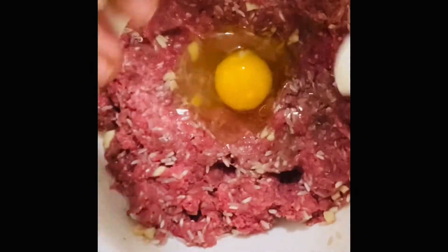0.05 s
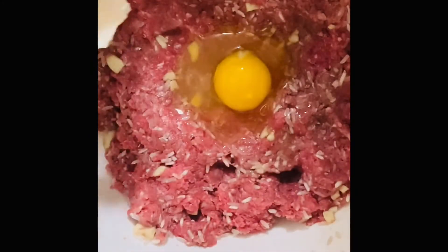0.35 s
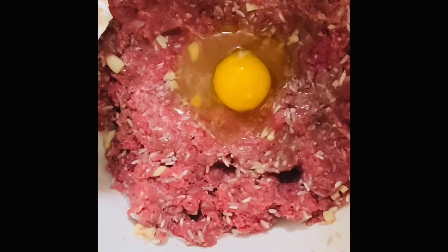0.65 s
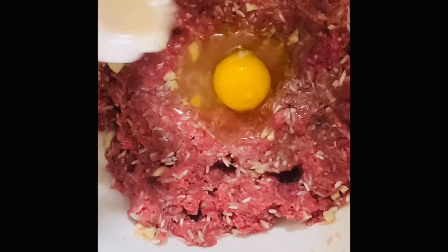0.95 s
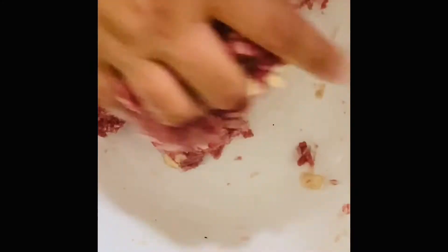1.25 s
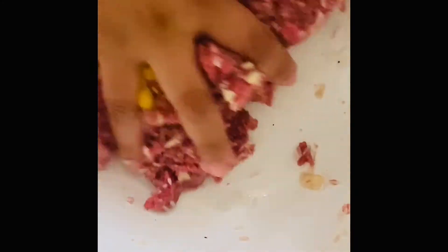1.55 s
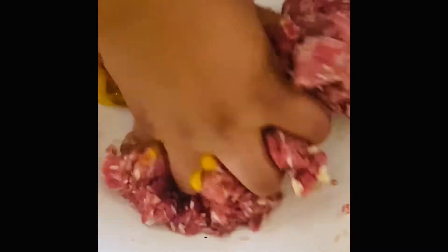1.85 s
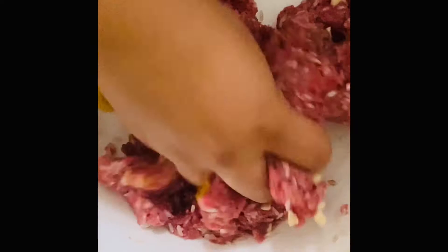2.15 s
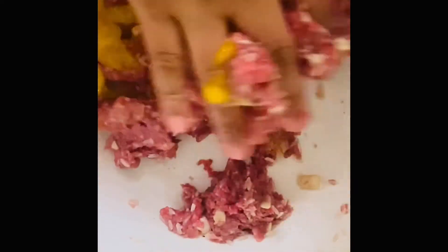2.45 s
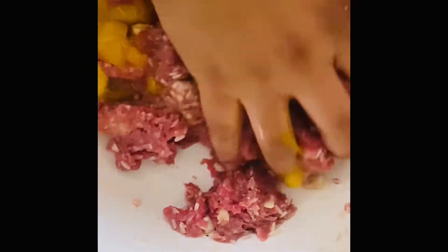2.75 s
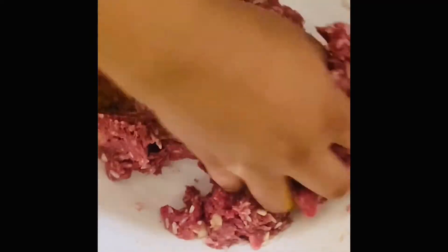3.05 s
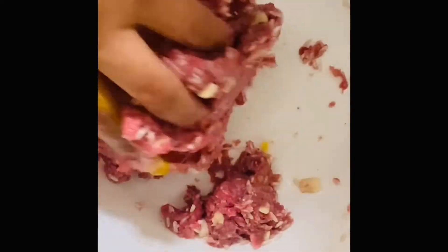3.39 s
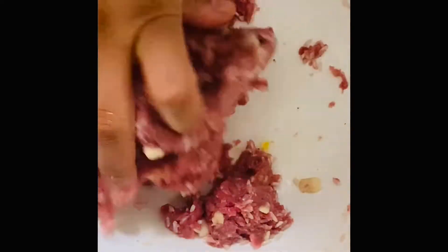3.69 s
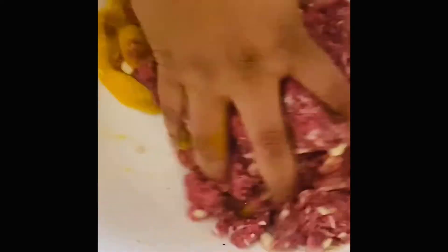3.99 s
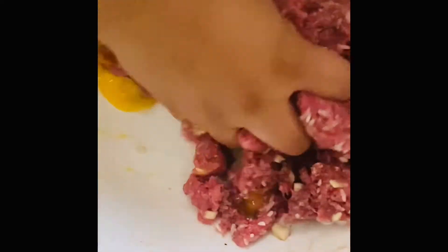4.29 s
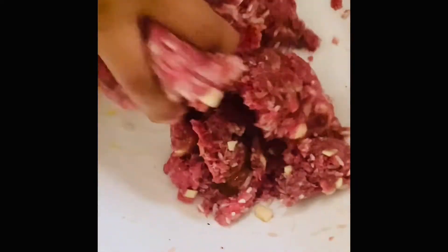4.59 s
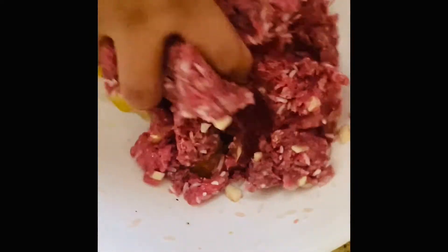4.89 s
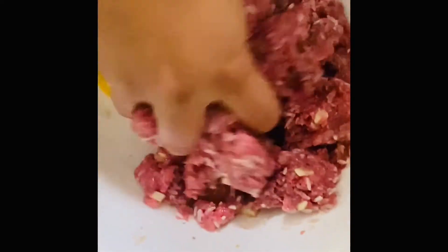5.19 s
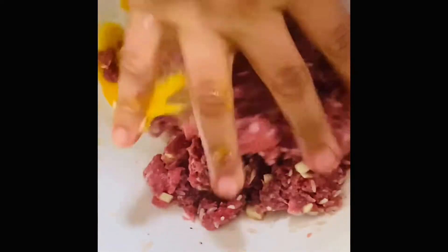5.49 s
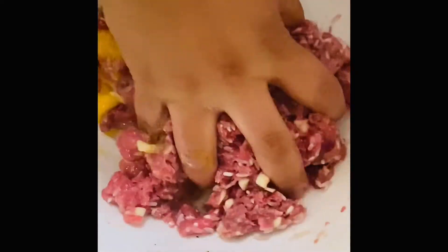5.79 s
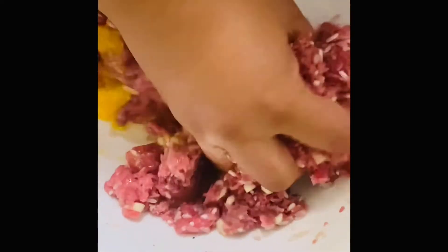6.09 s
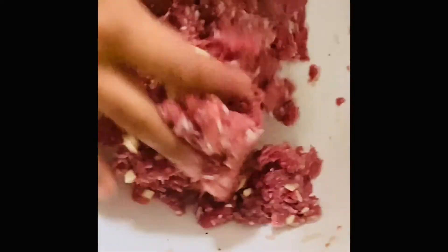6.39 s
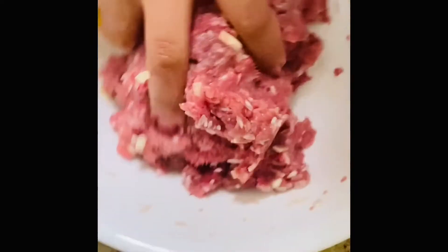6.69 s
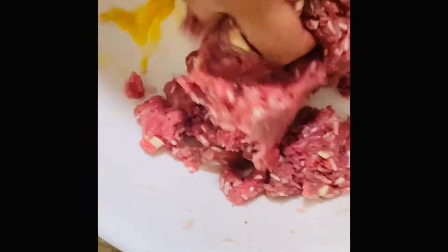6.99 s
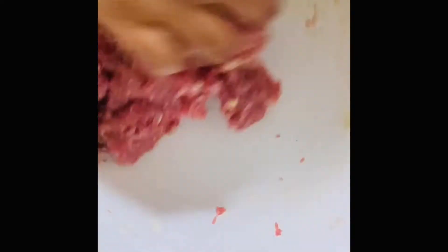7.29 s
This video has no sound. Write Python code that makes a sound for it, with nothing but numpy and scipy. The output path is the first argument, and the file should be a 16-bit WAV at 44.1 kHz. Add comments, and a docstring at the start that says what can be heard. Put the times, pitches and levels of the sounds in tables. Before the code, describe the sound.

Wet, sticky squishing comes in uneven squeezes as a hand mixes ground meat with egg and rice close to the microphone, with tiny air pockets crackling and popping. The bowl rocks with dull thuds, clinks once, scrapes briefly across the counter and then gives two sharp knocks. Near the end a muffled bump hits the microphone while the kneading carries on. An appliance hums faintly in the small kitchen.

```python
"""A bare hand kneads ground meat, rice and egg in a bowl on a kitchen counter, close to a phone.
First comes dry brushing over the hum of a small, echoing room. From about 1 s the hand squeezes:
wet films tear and air pockets crackle and pop, while the rocking bowl knocks on the counter.
The rim clinks at 2.5 s, the bowl skids at 3.3 s, and it knocks hardest at 4.3 s and 5.2 s.
A wet fingertip squeaks at 5.8 s, the phone is bumped at 6.2 s, and the kneading carries on."""
import sys
import numpy as np
from scipy import signal
from scipy.fft import rfft, irfft
from scipy.io import wavfile

SR = 44100
rng = np.random.default_rng(int(sys.argv[2]) if len(sys.argv) > 2 else 0)


def waveform_to_disk(signal):
    """Save audio, clipped to [-1, 1], as 16-bit WAV at the path in sys.argv[1]."""
    frames = np.transpose(np.atleast_2d(signal))
    scaled = np.clip(frames, -1, 1) * 32767
    samples = np.round(scaled).astype(np.int16)
    wavfile.write(sys.argv[1], SR, samples)


N = 328533
TIME, FREQS = np.arange(N) / SR, np.fft.rfftfreq(N, 1 / SR)
RING_T = np.arange(SR // 2) / SR  # half a second: the clock for one short sound


def amp(db):
    """Turns decibels into a number to multiply by."""
    return 10 ** (np.asarray(db) / 20)


def evened(x):
    """Scales a sound to an average strength (rms) of one."""
    return x / np.sqrt(np.mean(x ** 2) + 1e-20)


def read(points, hz):
    """Looks up a frequency in a table, sliding between rows on a log scale."""
    f, value = np.transpose(points)
    return np.interp(np.log(hz + 1), np.log(f + 1), value)


def shaped(x, gain):
    """Turns each frequency up or down, then evens the strength."""
    return evened(irfft(rfft(x) * gain, N))


def cut(x, hz, kind="low", order=2):
    """Keeps the part below ("low") or above ("high") a frequency."""
    return signal.sosfilt(signal.butter(order, min(hz, SR / 2 - 100), kind, fs=SR, output="sos"), x)


def fade(t60):
    """Dies away by 60 dB in t60 seconds: the "fade time" in the tables."""
    return amp(-60 * RING_T / max(t60, 1e-4))


def add(mix, s, sound):
    """Mixes a sound in at s seconds."""
    part = mix[max(round(s * SR), 0):][:len(sound)]
    part += sound[:len(part)]


def noise(spectrum):
    """Steady noise with the given tone colour."""
    return shaped(rng.standard_normal(N), amp(read(spectrum, FREQS)))


def flutter(depth_db, low_hz, high_hz):
    """A loudness that wobbles at random, at rates between the two given."""
    wobble = shaped(rng.standard_normal(N), (FREQS > low_hz) & (FREQS < high_hz))
    return evened(amp(depth_db * wobble))


def excerpt(x):
    """A random half second of a long sound."""
    return x[rng.integers(N - len(RING_T)):][:len(RING_T)]


def grains(low_hz, high_hz, per_s, spread_db, cycles, count=16):
    """Crackle: tiny, very short ticks of many pitches at random moments."""
    out, t = np.zeros(N), RING_T[:SR // 40]
    for hz in np.geomspace(low_hz, high_hz, count):
        size = amp(spread_db * np.minimum(rng.exponential(1, N), 4)) * rng.choice([-1, 1], N)
        train = size * (rng.random(N) < per_s / count / SR)
        tick = hz * np.sin(2 * np.pi * hz * t) * np.exp(-hz * t / cycles)
        out += signal.oaconvolve(train, tick)[:N]
    return evened(out)


def crowded(x, mush, count=14):
    """Swaps a share of a crackle for many more, smaller ticks."""
    dense = sum(np.roll(x, shift) for shift in rng.integers(N, size=count)) / np.sqrt(count)
    return np.sqrt(1 - mush) * x + np.sqrt(mush) * dense


def ring(notes):
    """The fading notes of a struck object; neighbours swing opposite ways."""
    return sum((-1) ** k * amp(db) * np.sin(2 * np.pi * hz * RING_T) * fade(t60)
               for k, (hz, db, t60) in enumerate(notes))


def resonate(x, hz, width_hz):
    """Brings out the part of a sound near one pitch, which may glide."""
    turn = np.exp(2j * np.pi * np.cumsum(hz * np.ones(len(x))) / SR)
    r = np.exp(-np.pi * width_hz / SR)
    return (turn * signal.lfilter([(1 - r) ** 2], [1, -2 * r, r * r], x / turn)).real


def swells(moves, release_s, rest_db, swell_db=18.5):
    """Loudness of hand movements: each rises by swell_db over its build-up, then lets go."""
    power = amp(rest_db) ** 2 * np.ones(N)
    for s, build_s, db in moves:
        away = np.maximum((s - TIME) / build_s, (TIME - s) / release_s)
        near = away < 5
        power[near] += amp(db - swell_db * away[near]) ** 2
    return np.sqrt(power)


# tone colour of the quiet room: (frequency [Hz], level [dB])
ROOM_HUSH = [(20, -6), (55, 39.5), (150, -7), (270, 11), (700, -6), (1000, -6), (1900, -3), (3500, -11),
             (8000, -28), (15500, -14)]
def background(hush_db=-59, hum_db=-57.0, hum_hz=119):
    """The room's soft hush and the hum of an appliance."""
    shared = noise(ROOM_HUSH)
    sides = cut(np.array([noise(ROOM_HUSH), noise(ROOM_HUSH)]), 305, "high")
    return amp(hush_db) * (shared + 1.37 * sides) + amp(hum_db) * np.sin(2 * np.pi * hum_hz * TIME)


# the hand leaning on the bowl: (time of full weight [s], build-up [s], strength [dB])
LEANS = [(1.7, 0.37, -48.5), (2.57, 0.082, -36), (2.98, 0.17, -64), (3.36, 0.044, -37), (3.48, 0.096, -34),
         (3.72, 0.36, -31.5), (4.07, 0.087, -41.5), (4.44, 0.11, -39.5), (4.74, 0.6, -43.5),
         (5.3, 0.25, -37.5), (5.6, 0.66, -39.5), (5.85, 0.41, -40.5), (6.17, 0.28, -28)]
def hand_weight():
    """How hard the hand presses down, moment by moment."""
    return swells(LEANS, release_s=0.3, rest_db=-59.5)


# tone colour of the shaking counter: (frequency [Hz], level [dB])
COUNTER_RUMBLE = [(20, -42), (40, -11), (62, -7.5), (85, -1), (125, 0), (200, -8.5), (350, -14.5),
                  (900, -35)]
def rumble(weight):
    """The counter rumbles faintly, and louder when the hand leans on the bowl."""
    return amp(-4.0) * weight * noise(COUNTER_RUMBLE)


# dry strokes: (time of peak [s], build-up [s], strength [dB])
BRUSHES = [(0.17, 0.3, -53.5), (0.39, 0.96, -57.5), (0.58, 0.3, -52.5), (0.88, 0.13, -57.5)]
# their tone colour: (frequency [Hz], level [dB])
BRUSH_COLOUR = [(120, -40), (300, -3.5), (650, 1.5), (950, -4.5), (1400, 1.5), (2400, 1), (3500, -3.5),
                (8500, -3), (12500, -4.5), (15500, -9)]
def brushing():
    """Dry rubbing that stops as the hand goes into the meat."""
    strokes = swells(BRUSHES, release_s=0.25, rest_db=-67.0)
    return amp(6.0) * strokes * noise(BRUSH_COLOUR) * np.interp(TIME, [.9, .935], [1, 0])


# squeezes of the meat; mush runs from separate crackles to a dense squish:
# (time of tightest grip [s], build-up [s], gurgle [dB], fizz [dB], mush [0-1])
SQUEEZES = [(1.06, 0.64, -57, -49, 0.18), (1.29, 0.23, -47, -49, 0.65), (1.63, 0.22, -46, -47.5, 0.3),
            (1.84, 0.5, -46.5, -47, 0.34), (2.09, 0.67, -49.5, -43.5, 0.5), (2.34, 0.22, -83, -51, 0.4),
            (2.61, 0.23, -45.5, -54, 0.44), (2.78, 0.23, -47, -46.5, 0.15), (2.925, 0.095, -51, -40, 0.04),
            (3.0, 0.097, -51, -72, .4), (3.13, 0.068, -76, -53, 0.34), (3.85, 0.37, -36, -50.5, 0.77),
            (4.03, 0.14, -41, -45.5, 0.27), (4.325, 0.19, -42.5, -40.5, .3), (4.63, 0.66, -48.5, -59, 0.56),
            (4.94, 0.64, -47.5, -71, 0.35), (5.1, 0.29, -40.5, -41, 0.73), (5.3, 0.049, -46, -79.5, 0.4),
            (5.46, 0.032, -43, -78, 0), (5.65, 0.15, -49, -52, 0), (5.84, 0.95, -51, -59, 0.76),
            (6.0, 0.16, -36.5, -38, 0.55), (6.5, 0.14, -50, -48, .97), (6.64, 0.15, -43, -48.5, 0.64),
            (6.8, 0.083, -44, -44.5, 0.86), (6.93, 0.23, -50, -43.5, 0.9), (7.03, 0.055, -49.5, -48.5, 0.9),
            (7.208, 0.14, -49.5, -53, 0.1)]
# dips as the hand stops between strokes, and one small lift:
# (middle time [s], half length [s], level change [dB])
PAUSES = [(3.235, 0.035, 0), (4.602, 0.015, -3), (4.815, 0.025, -6), (5.386, 0.024, -12), (5.815, 0.031, 4),
          (6.396, 0.039, -14), (7.12, .02, -16)]
def grip(release_s=0.18, cling_gurgle_db=-73, cling_fizz_db=-57.5):
    """Gurgle, fizz and mush over time; between squeezes, meat still clings to the fingers."""
    idle_db = -25 * ((TIME < 1) | (TIME > 7.1))  # less clinging at the start and the end
    moving = amp(sum(db * np.exp(-((TIME - s) / half_s) ** 2) for s, half_s, db in PAUSES))
    s, build_s, gurgle_db, fizz_db, mush = np.transpose(SQUEEZES)
    gurgle = moving * swells(zip(s, build_s, gurgle_db), release_s, cling_gurgle_db + idle_db)
    fizz = moving * swells(zip(s, build_s, fizz_db), release_s, cling_fizz_db + idle_db)
    return gurgle, fizz, np.clip(np.interp(TIME, s, mush), 0, .99)


# tone colour of wet meat: (frequency [Hz], level [dB])
MEAT_COLOUR = [(100, -27), (280, -3), (480, 2), (720, 5), (930, 0), (1600, 2.5), (2300, 3), (3500, -7),
               (6500, -5), (9000, -5.5), (12500, -1), (15500, -0.5)]
def squelch(gurgle, fizz, mush, hiss_db=-9, split_hz=3800):
    """Air pockets gurgle low and sticky films tear with a fizz; packed meat runs them together."""
    colour, low_share = amp(read(MEAT_COLOUR, FREQS)), 1 / (1 + (FREQS / split_hz) ** 4)
    tears = grains(3160, 10000, per_s=600, spread_db=4.4, cycles=1.0)
    tears = shaped(tears, 1 / np.sqrt(FREQS + 500))
    pockets = grains(443, 5200, per_s=450, spread_db=6.0, cycles=3.7) + 0.5 * tears
    pockets += amp(hiss_db) * rng.standard_normal(N)
    films = grains(3000, 12000, per_s=1400, spread_db=0.0, cycles=0.21) + 1.8 * tears
    films += amp(hiss_db) * rng.standard_normal(N)
    clumps = flutter(2.0, 15, 90)
    lows = shaped(crowded(pockets, mush), colour * np.sqrt(low_share))
    highs = shaped(crowded(films, mush), colour * np.sqrt(1 - low_share))
    return clumps * (amp(-2.0) * gurgle * lows + amp(3.0) * fizz * highs)


# dull pushes on the counter: (time [s], level [dB], pitch [Hz], fade time [s])
THUDS = [(0.938, -32, 180, 0.04), (1.616, -38.5, 66, 0.4), (1.931, -36.5, 72.4, 0.62),
         (2.047, -29, 64.3, 0.19), (2.223, -22.5, 65.5, 0.17), (2.332, -32, 54.7, 0.42),
         (2.554, -44, 147, 0.51), (2.89, -38.5, 174, 0.3), (3.309, -16, 126, 0.094),
         (3.313, -31.5, 198, 0.22), (3.46, -12, 165, 0.043), (3.631, -23, 135, 0.16),
         (3.829, -26, 132, 0.18), (4.353, -32, 117, 0.18), (4.355, -10, 186, 0.063),
         (4.439, -34, 58.5, 0.2), (5.108, -25.5, 119, 0.25), (5.185, -28.5, 127, 0.17),
         (5.548, -17, 140, 0.034), (5.772, -38.5, 80.6, 0.18), (5.986, -30, 140.4, 1),
         (6.066, -23.5, 135, 0.18)]
def thuds(attack_s=0.0076, roughness=0.45):
    """Each soft push sets the counter swinging with a low, rough note."""
    out, shake = np.zeros(N), noise(COUNTER_RUMBLE)
    for s, db, hz, t60 in THUDS:
        swing = np.sin(2 * np.pi * hz * RING_T) + roughness * cut(excerpt(shake), 1.77 * hz)
        add(out, s, amp(db) * swing * fade(t60) * (1 - np.exp(-(RING_T / attack_s) ** 2)))
    return out


# the bowl hitting the counter: (time [s], level [dB], dulled above [Hz], wall level [dB],
# wall pitch [factor], pitch where the base rings most [Hz])
KNOCKS = [(0.944, -47, 1500, 6, 0.73, 260), (1.953, -23, 1320, -3, 0.82, 850),
          (2.547, -19.5, 900, 0.5, 0.83, 520), (2.587, -25.5, 800, -14, 0.8, 380),
          (2.605, -28, 600, -14, 0.8, 330), (2.89, -21.5, 1800, -9, 0.88, 1020),
          (4.056, -20.5, 1500, -13, 1, 1150), (4.3495, 1.5, 2420, 1.5, 1.04, 503),
          (4.3526, -7.5, 2200, -1, 1.2, 417), (4.749, -25.5, 1200, -5, 0.59, 1000),
          (5.1525, 4, 3200, 1.5, 0.97, 547), (5.1675, -7.5, 1504, 4.5, 0.96, 760),
          (5.56, -21.5, 900, -9, 0.96, 746), (6.003, -13, 326, -16, 1, 324),
          (6.065, -1.5, 890, -3, 1.03, 670), (6.074, -6.5, 910, -17, 0.86, 600),
          (6.127, -8, 650, -3, 1, 556), (6.72, -27.5, 1410, -5, 0.94, 700), (7.382, -21, 500, 1.5, 1, 440),
          (7.391, -28.5, 403, -13, 0.57, 520)]
# notes of the full bowl, base first, then walls: (pitch [Hz], level [dB], fade time [s])
BOWL_NOTES = [(205, -10.5, 0.14), (270, -1, 0.042), (435.5, -6, 0.076), (485, -11, 0.12),
              (598.6, -8, 0.088), (660, -10.5, 0.12), (737, -3, 0.1), (807, -12.5, 0.14),
              (1064, -12, 0.0085), (1310, -29, 0.025), (1527, -4, 0.034), (1925, 1.5, 0.016),
              (2760, -14, 0.0094)]
# tone colour of the crack at the bowl's foot: (frequency [Hz], level [dB])
FOOT_CRACK = [(100, 4), (260, 7), (700, 16), (1050, 4.5), (1600, 11), (2200, -5), (2600, -3), (4300, 0.5),
              (7000, -8), (15000, -14)]
def knocks(wall_hz=1200, focus_db=5, contact_s=0.00033):
    """The bowl tips and drops back: its foot cracks, it rings by how it lands, the meat smacks."""
    out, grit = np.zeros(N), noise(FOOT_CRACK)
    wet = grains(1700, 6500, per_s=2100, spread_db=2.0, cycles=0.4)
    onset = 1 - np.exp(-RING_T / contact_s)
    for s, db, bright_hz, wall_db, wall_pitch, focus_hz in KNOCKS:
        base = ring([(hz, note_db - focus_db * np.log2(hz / focus_hz) ** 2, t60)
                     for hz, note_db, t60 in BOWL_NOTES if hz < wall_hz])
        wall = ring([(hz * wall_pitch, note_db + wall_db, t60)
                     for hz, note_db, t60 in BOWL_NOTES if hz >= wall_hz])
        crack = amp(-9) * excerpt(grit) * fade(0.051)
        smack = amp(-24) * excerpt(wet) * fade(0.027)
        knock = cut(amp(-6) * (base + wall) + crack, bright_hz, order=1)
        add(out, s, amp(db) * (knock + smack) * onset)
    return out


def small_pockets(strength, count=70, over_db=9.5, spread_db=4.0, middle_hz=2100, octaves=0.64):
    """Rows for pops(): small pockets burst at random, louder when the grip is tight."""
    at = ((np.arange(count) + rng.random(count)) / count * N).astype(int)
    size, pitch, snap = np.clip(rng.standard_normal((count, 3)), -2, 2).T
    db = 20 * np.log10(strength[at]) + over_db + spread_db * size
    return list(zip(at / SR, db, middle_hz * 2 ** (octaves * pitch), -17 + spread_db * snap))


# big air pockets bursting: (time [s], level [dB], pitch of the hollow [Hz], snap of the film [dB])
BIG_POCKETS = [(0.9465, -32.5, 1660, 3.5), (1.034, -29, 7400, -4), (1.097, -31, 6860, -1),
               (1.130, -37, 5470, 4), (1.198, -34, 1670, -25), (1.276, -28, 2250, -20),
               (1.293, -39, 3000, 15.5), (1.6355, -10.5, 2200, -1.5), (1.646, -24, 1900, -18),
               (1.669, -8, 2180, -24), (1.68, -26, 1900, -22), (1.7315, -24, 2640, -18),
               (1.7635, -29, 5700, -2), (1.8166, -15, 2610, -31), (1.884, -28, 3300, 1),
               (1.8945, -21, 1800, -6), (1.955, -23, 1140, 1), (2.1056, -20, 1950, -0.5),
               (2.112, -23, 4130, -1), (2.504, -36.5, 4230, 5.5), (2.688, -33, 6500, -9),
               (2.7392, -25.5, 2370, -19), (2.778, -21.5, 1580, -15), (2.821, -33.5, 6200, 9),
               (2.8354, -28.5, 2330, -16), (2.907, -22, 5300, -6), (2.922, -17.5, 2900, -14),
               (2.9295, -22, 6600, 8), (2.9612, -14.5, 2580, -26), (2.9858, -30.5, 1620, 8.5),
               (3.1243, -34.5, 6850, -14), (3.671, -20, 1200, 5.5), (3.692, -21.5, 2020, -2),
               (3.767, -28, 2050, -10), (3.8325, -20.5, 2340, -2.5), (3.865, -33, 6100, -10),
               (3.899, -34.5, 1700, 4), (3.9729, -23.5, 2660, -4), (4.0043, -27, 3960, 1.5),
               (4.044, -25.5, 1750, -22), (4.0548, -20.5, 1680, -4), (4.068, -33, 3300, -10),
               (4.091, -27, 2250, -22.5), (4.122, -33, 6900, -4), (4.1435, -24, 3660, -4),
               (4.166, -26, 1770, -9), (4.208, -30, 1240, -16), (4.2445, -18, 1830, -16),
               (4.26, -25.5, 3230, -7), (4.2795, -32, 3800, -14), (4.3053, -33, 2250, -8),
               (4.313, -22, 2470, -18), (4.3228, -23, 2650, 6), (4.6275, -16.5, 2090, -2.5),
               (4.6636, -25.5, 1530, -6), (4.791, -28, 2400, -20), (4.8078, -23, 1020, -8),
               (4.885, -33, 2100, -13), (4.894, -34, 6400, -7), (4.921, -30, 6400, -11),
               (4.93, -29, 6700, -15), (4.943, -30, 3180, -18), (4.9714, -24.5, 2730, -24),
               (4.995, -22.5, 2200, -18), (5.063, -27, 4050, -8), (5.07, -30, 6900, -4),
               (5.078, -28, 5400, -7), (5.089, -21, 3700, -13), (5.122, -26, 6000, -6),
               (5.389, -34, 2060, -26), (5.4294, -34.5, 3230, 3), (5.4613, -24.5, 1410, -1),
               (5.563, -29.5, 5560, -9), (5.6343, -24, 1630, -12), (5.674, -27.5, 2640, -1),
               (5.7128, -19.5, 3200, -12), (5.782, -28, 3620, -4.5), (5.804, -31, 1780, 2.5),
               (5.8705, -25.5, 5830, 0), (5.891, -27, 2680, -18), (5.906, -29, 4400, -4),
               (5.926, -30, 3520, 1), (6.055, -16, 3300, -18), (6.119, -24, 3800, -1),
               (6.339, -35.5, 6060, -1), (6.351, -29.5, 6950, -3.5), (6.423, -49, 7000, 5),
               (6.4735, -27, 2300, -3), (6.578, -32, 3000, -14), (6.593, -29, 1400, -13),
               (6.6235, -35, 1800, 3), (6.6533, -24, 1350, 1.5), (6.661, -30, 1250, -14),
               (6.691, -31, 1720, -12), (6.7, -27.5, 5000, -4), (6.711, -32, 6500, -1),
               (6.743, -28.5, 1400, -30), (6.758, -33, 7800, -10), (6.775, -28, 1880, 0),
               (6.817, -28, 1340, -12), (6.904, -26, 3750, -8), (6.947, -29, 3460, -22),
               (6.9618, -28, 3730, -16), (6.971, -28, 3250, -13), (7.0462, -25, 1700, -13),
               (7.154, -38, 2100, 9), (7.2002, -31, 2130, 1), (7.226, -27, 2340, -1.5),
               (7.3244, -32, 2270, 3)]
def pops(small_rows, hollow_t60=0.015, snap_t60=0.0069, spit_t60=0.035, delay_s=0.000974):
    """A wet film snaps, the opened hollow rings raggedly, and a little spitting follows."""
    out, droplets = np.zeros(N), grains(1000, 5300, per_s=5000, spread_db=4.0, cycles=0.8)
    click = amp(5) * cut(fade(.0006), 3000, "high")
    for s, db, hz, snap_db in BIG_POCKETS + small_rows:
        air, film = rng.standard_normal((2, len(RING_T)))
        ragged = evened(resonate(air, hz, width_hz=hz))
        hollow = amp(-6) * np.sin(2 * np.pi * hz * RING_T) + amp(-9) * ragged
        snap = amp(snap_db) * (click + amp(-1) * cut(film * fade(snap_t60), 2000, "high"))
        spit = amp(-23) * excerpt(droplets) * fade(spit_t60)
        add(out, s + delay_s, amp(db) * (hollow * fade(hollow_t60) + snap + spit))
    return cut(out, 820, "high")  # the pops keep no bass


# meat sucking loose from the bowl: (time [s], level [dB], length [s], first pitch [Hz], last pitch [Hz])
SLURPS = [(1.2, -45.5, 0.029, 1600, 1930), (1.265, -54, 0.022, 2200, 1460), (1.478, -49, 0.017, 4040, 3850),
          (1.73, -39.5, 0.022, 2770, 2430), (1.809, -42, 0.085, 2100, 1420),
          (2.436, -50.5, 0.069, 1410, 1050), (2.921, -43, 0.084, 2880, 2700),
          (2.979, -42.5, 0.068, 1830, 945), (4.182, -53, 0.037, 1500, 1100), (6.654, -37, 0.01, 2670, 1540),
          (6.713, -45, 0.035, 1105, 810)]
def slurps(width_hz=1200, weakening=1.4):
    """Air is pulled through a wet gap whose pitch glides as it opens."""
    out, bubbling = np.zeros(N), grains(630, 5000, per_s=6600, spread_db=5.5, cycles=0.35)
    for s, db, length, start_hz, end_hz in SLURPS:
        size = int(length * SR)
        progress = np.linspace(0, 1, size)
        gap = resonate(excerpt(bubbling)[:size], start_hz * (end_hz / start_hz) ** progress, width_hz)
        outline = signal.windows.tukey(size, .3) * np.exp(-weakening * progress)
        add(out, s, amp(db) * evened(gap * outline))
    return out


# fingers dragging along the bowl: (time [s], level [dB], length [s])
DRAGS = [(1.955, -44, 0.046), (2.445, -52, 0.047), (2.985, -46, 0.073), (4.586, -48, 0.083),
         (4.782, -44, 0.058), (5.364, -47, 0.05), (5.63, -47, 0.081)]
def drags(weight, upper_hz=730, lower_hz=620, width_hz=110):
    """Rubbing makes two bowl notes hum: faintly under the hand's weight, clearly as a finger drags."""
    upper, lower = rng.standard_normal((2, N))
    hum = evened(resonate(upper, upper_hz, width_hz) + amp(-4) * resonate(lower, lower_hz, width_hz))
    out = amp(-22) * weight * hum
    for s, db, length in DRAGS:
        size = int(length * SR)
        add(out, s, amp(db) * evened(excerpt(hum)[:size] * signal.windows.tukey(size, .5)))
    return out


# hard taps on the bowl: (time [s], level [dB])
CLINKS = [(2.548, -29.5), (2.585, -43)]
# notes of the rim: (pitch [Hz], level [dB], fade time [s])
RIM_NOTES = [(2110, -3, 0.075), (3080, -22, 0.22), (4015, -0.5, 0.065), (5140, -3, 0.078),
             (6200, -7, 0.045), (6800, -7, 0.056), (7400, 1, 0.025)]
def clinks():
    """A hard tap makes a burst of noise and sets the rim ringing."""
    out = np.zeros(N)
    for s, db in CLINKS:
        tap = amp(2) * cut(rng.standard_normal(len(RING_T)), 8000) * fade(0.038)
        add(out, s, amp(db) * (ring(RIM_NOTES) + tap))
    return out


# the bowl skidding: (time [s], level [dB], fade time [s], dulled above [Hz], first chatter pitch [Hz])
SKIDS = [(3.289, -38.5, 0.11, 6040, 2500), (3.298, -16.5, 0.28, 12600, 2410),
         (3.446, -23, 0.15, 7400, 2880), (3.459, -21.5, 0.2, 16000, 2100), (3.531, -22, 0.14, 8500, 2400),
         (3.563, -18.5, 0.089, 6300, 2160), (3.579, -24.5, 0.21, 15000, 4860),
         (3.623, -27.5, 0.36, 4070, 2920), (3.728, -28.5, 0.12, 3240, 2620), (3.825, -34, 0.1, 3600, 2440)]
# pitch bands that a skid stirs up: (pitch [Hz], width [Hz], level [dB])
SKID_BANDS = [(660, 250, -2), (980, 210, -6), (1470, 480, -1.5), (2200, 920, -13), (3180, 630, -1),
              (4830, 1100, 1), (5840, 130, 4), (6850, 220, 4), (8570, 840, -0.5), (10860, 1300, -2),
              (15000, 1500, -25)]
def skids(attack_s=0.0012, chatter_width_hz=900):
    """The bowl's foot catches and slips on the counter; its chatter sinks and dies as it stops."""
    colour = np.sqrt(sum(amp(db) ** 2 / (1 + (2 * (FREQS - hz) / width) ** 2)
                         for hz, width, db in SKID_BANDS))
    slips = grains(690, 16400, per_s=2700, spread_db=2.5, cycles=0.66)
    rasp = cut(shaped(rng.standard_normal(N) + amp(-1) * slips, colour), 560, "high")
    out, judder = np.zeros(N), flutter(-0.5, 40, 250)
    for s, db, t60, bright_hz, chatter_hz in SKIDS:
        sinking_hz = chatter_hz * np.exp(-RING_T)
        chatter = amp(-6) * evened(resonate(excerpt(slips), sinking_hz, chatter_width_hz))
        outline = fade(t60) * (1 - np.exp(-RING_T / attack_s))
        skid = (excerpt(rasp) + chatter) * excerpt(judder) * outline
        add(out, s, amp(db) * cut(skid, bright_hz))
    return out


# a wet fingertip on the bowl: (time [s], level [dB], length [s], pitch [Hz])
SQUEAKS = [(5.814, -41, 0.11, 711)]
def squeaks(weakening=1.7):
    """Even sticking and slipping makes the bowl sing one note that weakens as the finger slows."""
    out = np.zeros(N)
    for s, db, length, hz in SQUEAKS:
        t = RING_T[RING_T < length]
        outline = signal.windows.tukey(len(t), .25) * np.exp(-weakening * (t / length) ** 2)
        add(out, s, amp(db) * np.sin(2 * np.pi * hz * t) * outline)
    return out


# touches in one bump of the phone: (time [s], level [dB], fade time [s], lowest pitch shaken [Hz])
PHONE_TOUCHES = [(6.171, -7, 0.083, 900), (6.179, -6, 0.23, 30), (6.216, -9.5, 0.2, 30),
                 (6.243, -19, 0.34, 30)]
# tone colour of its rubbed case: (frequency [Hz], level [dB])
CASE_COLOUR = [(25, -24), (55, -6), (110, -4.5), (160, -5), (260, -11.5), (420, -20), (680, -15),
               (1200, -26), (2000, -23), (3500, -34.5), (7000, -44), (15000, -54)]
# the phone swinging in the hand that holds it: (pitch [Hz], level [dB], fade time [s])
PHONE_SWINGS = [(55, -4.5, 0.96), (107, 3, 0.25), (141.8, -4.5, 1.0)]
def phone_bump(swing_attack_s=0.0019, rub_attack_s=0.0026, bright_hz=3000, bright_t60=0.26):
    """Each touch swings the phone and rubs its case; the rubbing quickly turns dull."""
    out, rub = np.zeros(N), noise(CASE_COLOUR)
    sway = 0.96 * ring(PHONE_SWINGS) * (1 - np.exp(-RING_T / swing_attack_s))
    for s, db, t60, lowest_hz in PHONE_TOUCHES:
        rubbing = excerpt(rub) * (1 - np.exp(-RING_T / rub_attack_s))
        dull = cut(rubbing, bright_hz, order=1)
        touch = dull + (rubbing - dull) * fade(bright_t60) + sway
        add(out, s, amp(db) * cut(touch, lowest_hz, "high", order=1) * fade(t60))
    return cut(out, 46, "high", order=5)


# how long the kitchen echoes: (frequency [Hz], fade time [s])
ROOM_FADE = [(120, 0.34), (600, 0.48), (1800, 0.42), (6000, 0.13), (14000, 0.3)]
def kitchen(x, near_db, tail_db, near_t60=0.042):
    """Adds quick echoes off bowl and counter, then the room's longer ring, different left and right."""
    shape = (2, 2, len(RING_T))
    near, far = rng.choice([-1., 1.], shape) * (rng.random(shape) < .15)
    near = near * fade(near_t60) * (RING_T > .0006)
    near = cut(near / np.linalg.norm(near[0]), 1500, "high")  # long waves reach both sides alike
    hz, t, bands = signal.stft(far * (RING_T > .006), SR, nperseg=256)
    bands *= amp(-60 * t / read(ROOM_FADE, hz)[:, None])
    tail = signal.istft(bands, SR, nperseg=256)[1][:, :len(RING_T)]
    tail = tail + 0.83 * tail[::-1]  # each side gets much of the other
    echo = amp(near_db) * near + amp(tail_db) * tail / np.linalg.norm(tail[0])
    return x + signal.fftconvolve(x[None], echo, axes=1)[:, :N]


def scene():
    """Meat, bowl and phone in the echoing kitchen, over the counter's low sounds and the hush."""
    gurgle, fizz, mush = grip()
    weight, brush = hand_weight(), brushing()
    bursts = pops(small_pockets(np.hypot(gurgle, fizz) * np.sqrt(1 - mush)))
    kneading = brush + squelch(gurgle, fizz, mush) + bursts + slurps() + skids()
    kneading = kitchen(kneading, near_db=-12, tail_db=-11.5)
    bowl = kitchen(knocks() + clinks() + drags(weight) + squeaks(), near_db=-13.0, tail_db=-18.0)
    phone = kitchen(phone_bump(), near_db=-9.5, tail_db=-11.5)
    return kneading + bowl + phone + thuds() + background() + rumble(weight)


# how wide the sound spreads: (frequency [Hz], left-right difference [factor])
STEREO_WIDTH = [(40, 0.18), (200, 1.5), (450, 2.9), (800, 10.6), (1500, 0.64), (4000, 1.75), (10000, 1.7),
                (12500, 0.61)]
# left and right swing opposite ways near 5 kHz and above 12 kHz:
# (frequency [Hz], left-right phase difference [radians])
STEREO_PHASE = [(0, 0), (250, -.25), (700, -.8), (1100, -.1), (1800, 0), (2600, 1.1), (3600, .2),
                (4200, .6), (4700, 2.1), (5000, 4.2), (5250, 6.2), (6500, 7.2), (9000, 8.2), (11300, 8.7),
                (12500, 9.42), (16000, 9.42)]
def record(dry, top_hz=16000):
    """Makes the treble wide and hollow, trims the extreme lows and highs, and clips loud peaks."""
    middle = dry.mean(0)
    pair = rfft(middle) + rfft(dry - middle) * read(STEREO_WIDTH, FREQS)
    phase = np.interp(FREQS, *np.transpose(STEREO_PHASE))
    stereo = irfft(pair * np.exp(.5j * phase * np.array([[1], [-1]])), N)
    stereo = cut(stereo, 26, "high", order=3)
    treble_limit = signal.firwin(511, top_hz, window=("kaiser", 9), fs=SR)
    return signal.oaconvolve(np.clip(stereo, -1, 1), treble_limit[None], "same")


dry = scene()
out = record(dry)
waveform_to_disk(out)
```